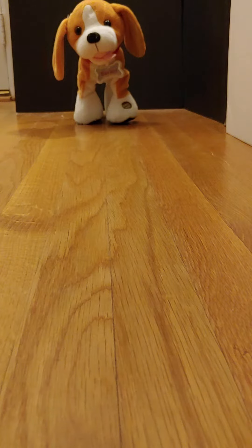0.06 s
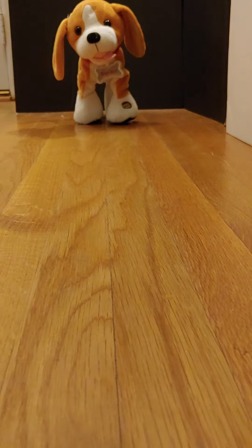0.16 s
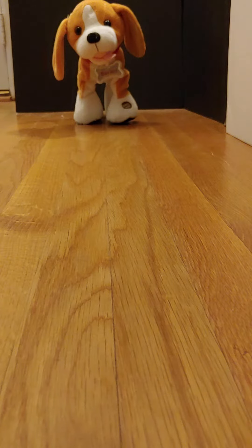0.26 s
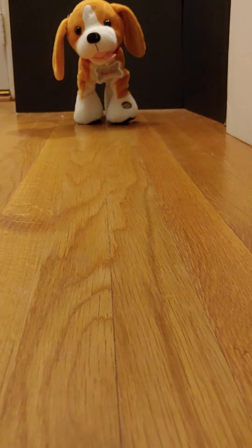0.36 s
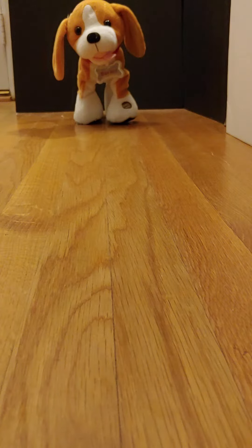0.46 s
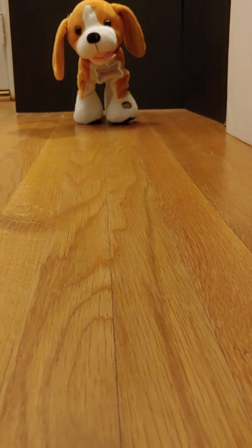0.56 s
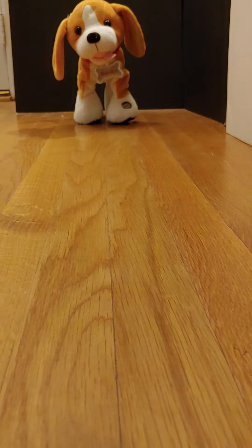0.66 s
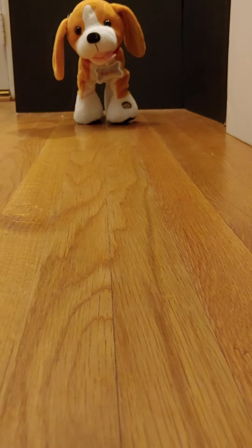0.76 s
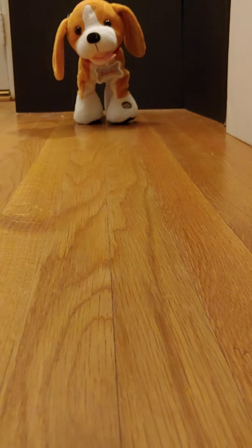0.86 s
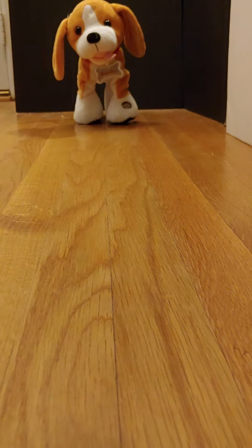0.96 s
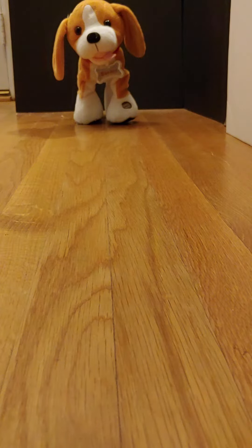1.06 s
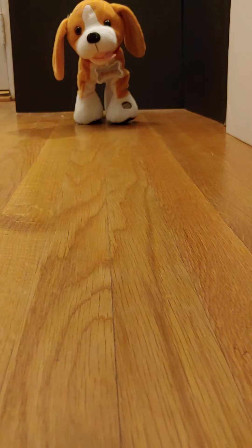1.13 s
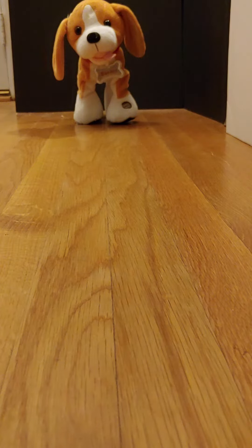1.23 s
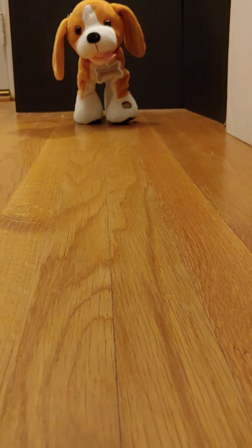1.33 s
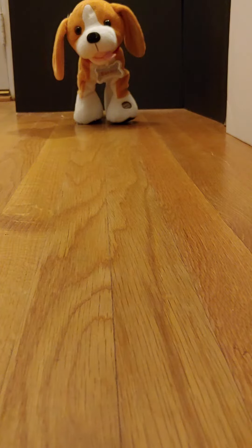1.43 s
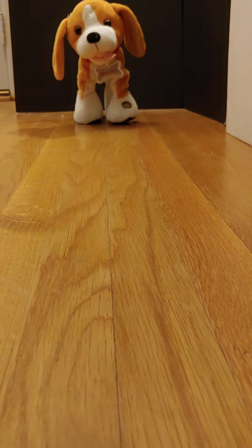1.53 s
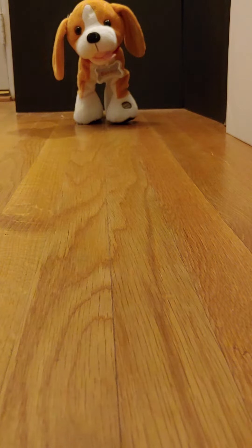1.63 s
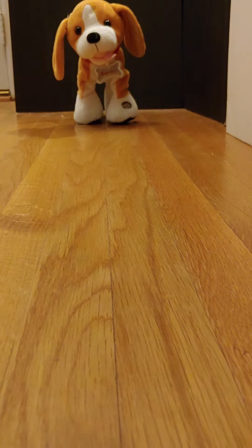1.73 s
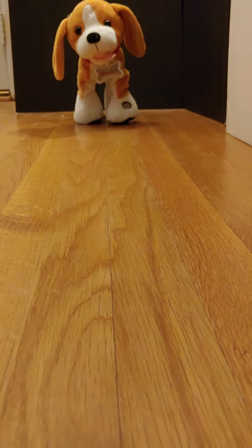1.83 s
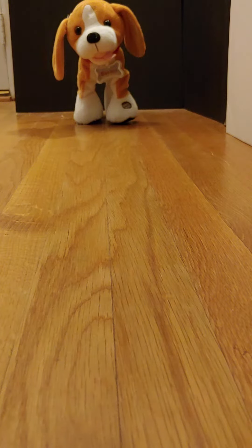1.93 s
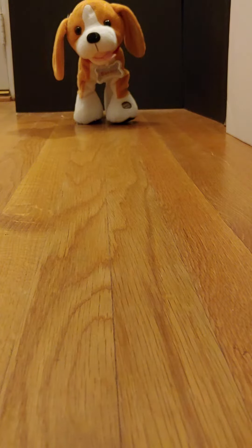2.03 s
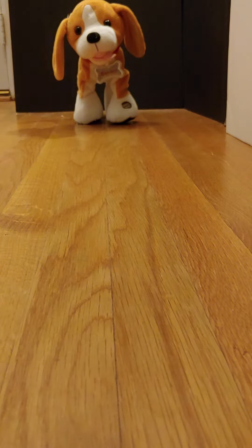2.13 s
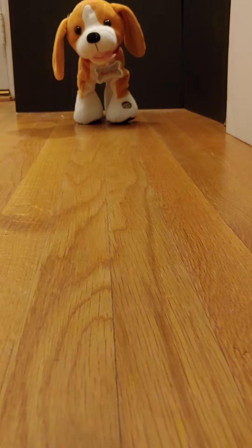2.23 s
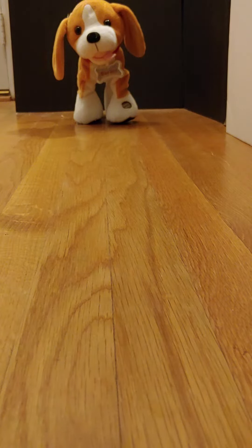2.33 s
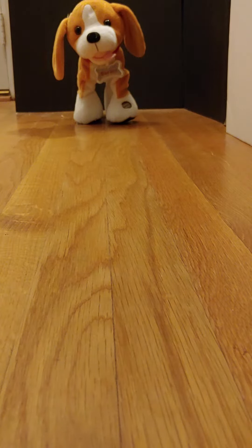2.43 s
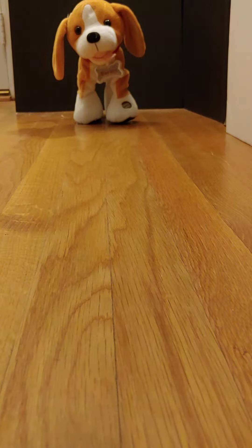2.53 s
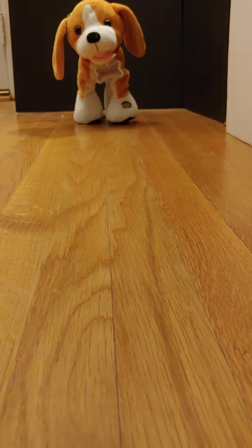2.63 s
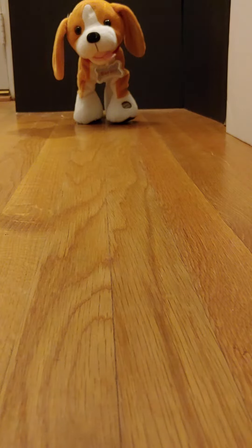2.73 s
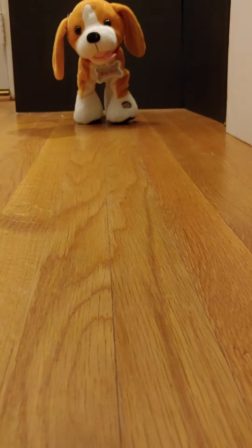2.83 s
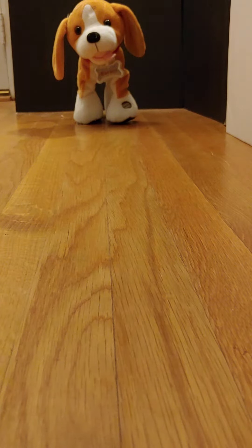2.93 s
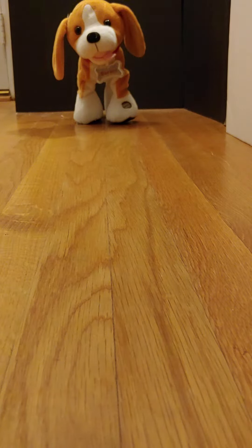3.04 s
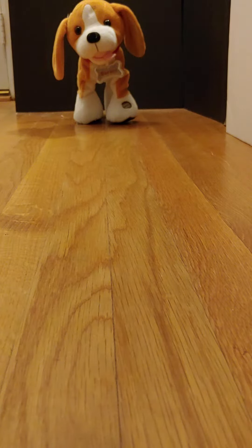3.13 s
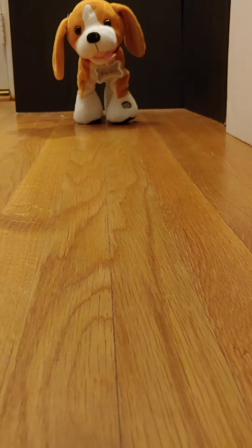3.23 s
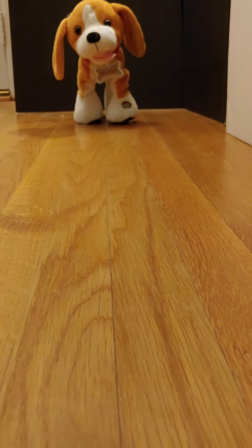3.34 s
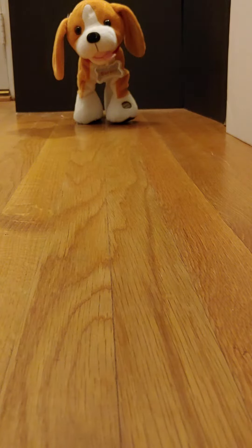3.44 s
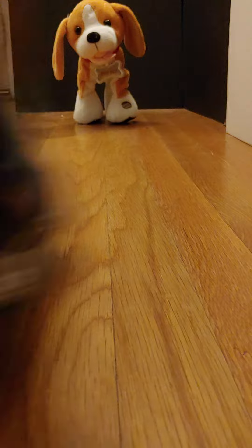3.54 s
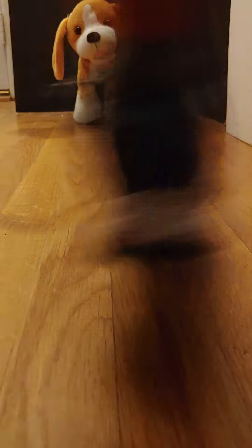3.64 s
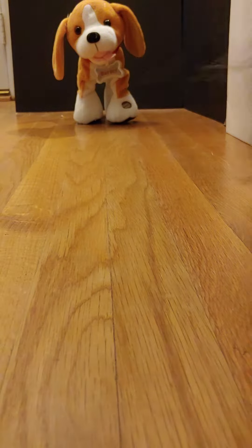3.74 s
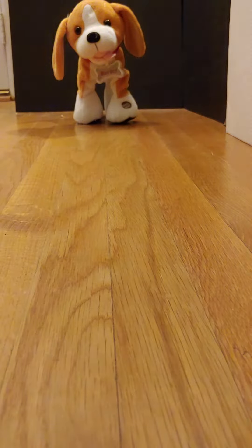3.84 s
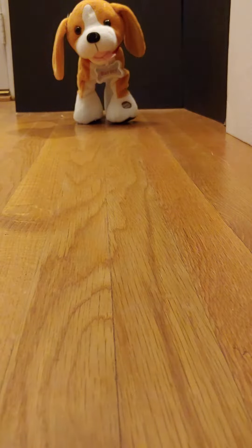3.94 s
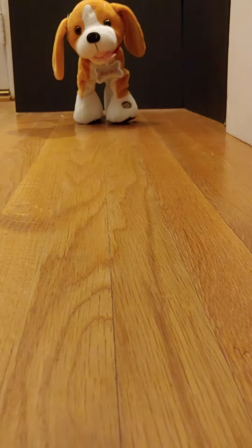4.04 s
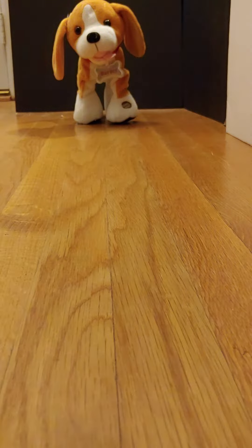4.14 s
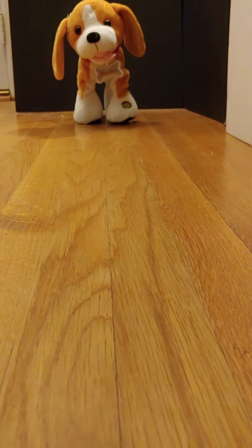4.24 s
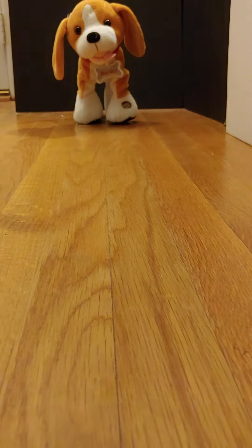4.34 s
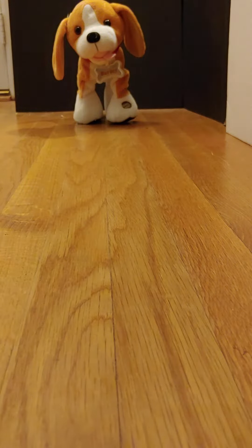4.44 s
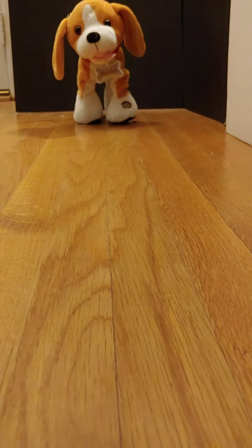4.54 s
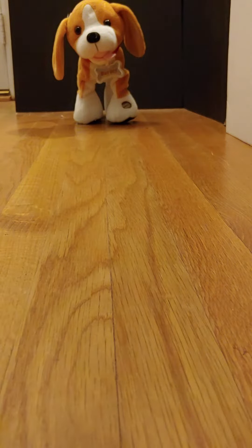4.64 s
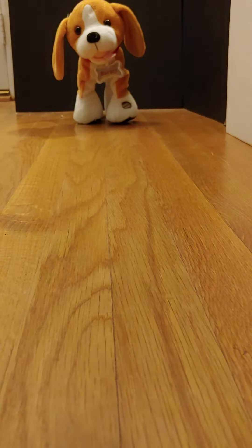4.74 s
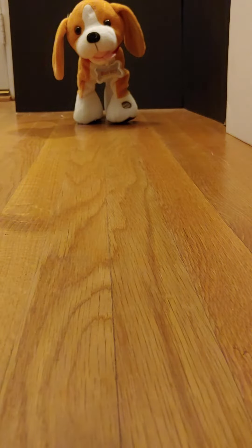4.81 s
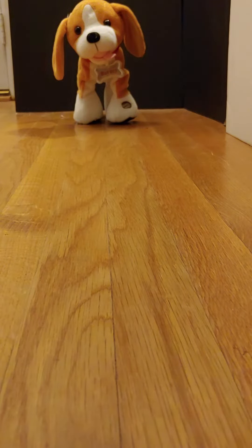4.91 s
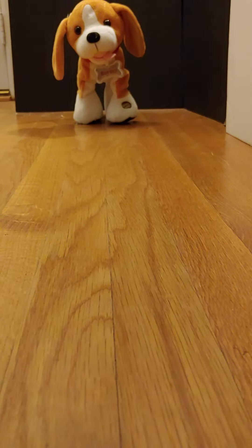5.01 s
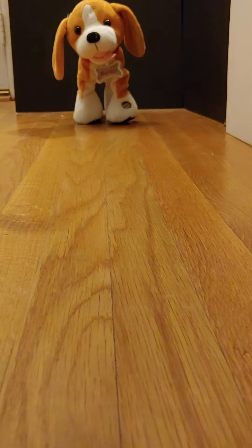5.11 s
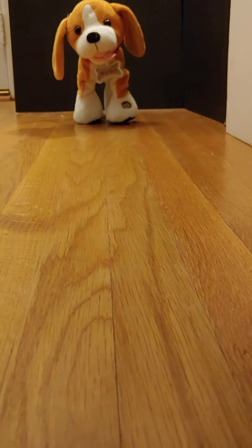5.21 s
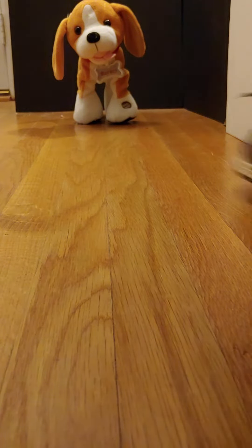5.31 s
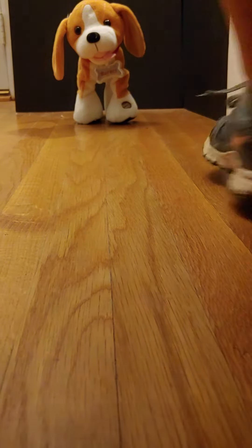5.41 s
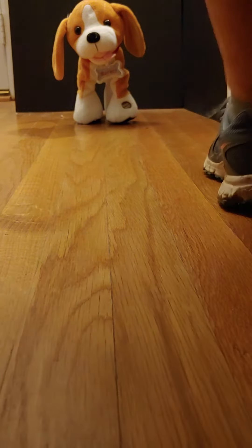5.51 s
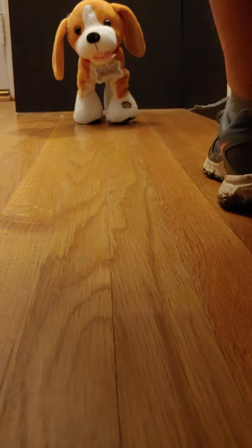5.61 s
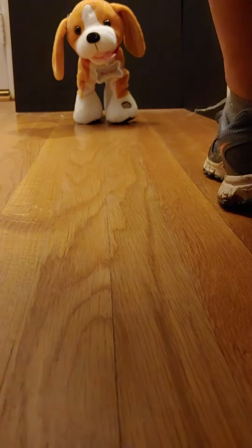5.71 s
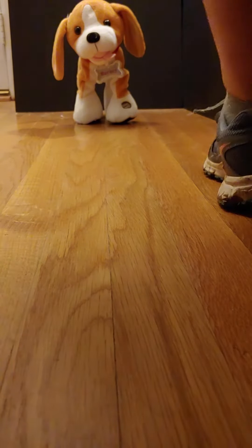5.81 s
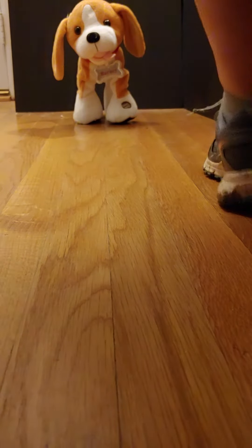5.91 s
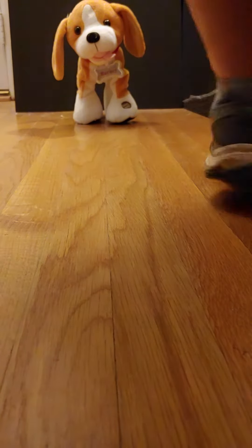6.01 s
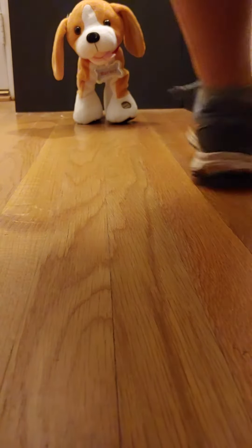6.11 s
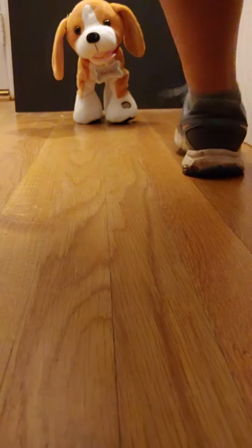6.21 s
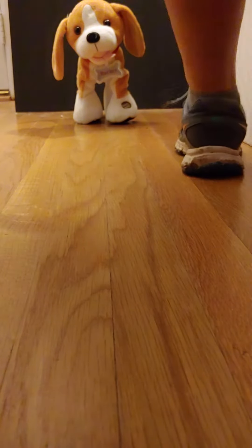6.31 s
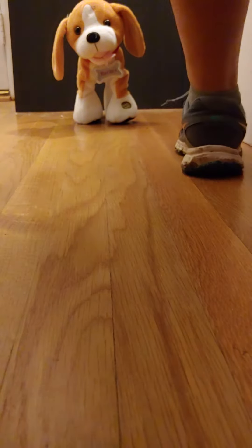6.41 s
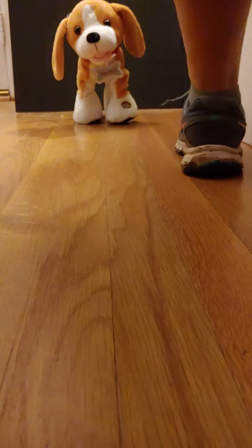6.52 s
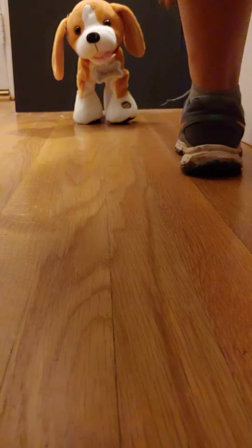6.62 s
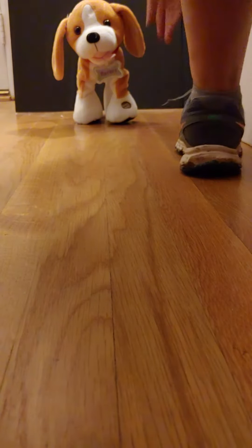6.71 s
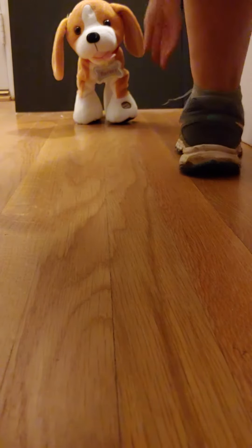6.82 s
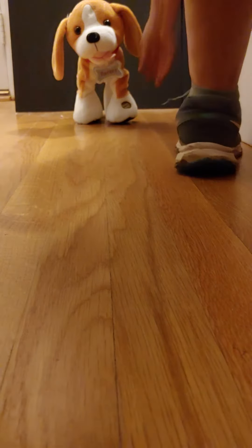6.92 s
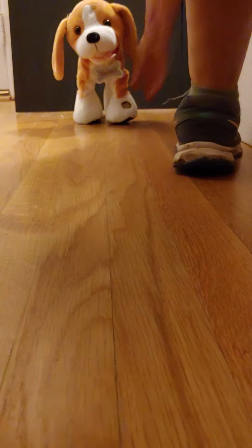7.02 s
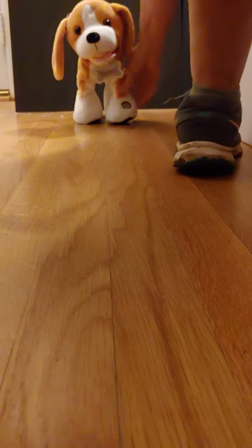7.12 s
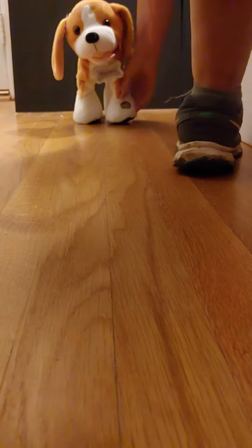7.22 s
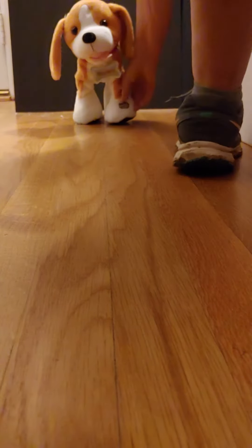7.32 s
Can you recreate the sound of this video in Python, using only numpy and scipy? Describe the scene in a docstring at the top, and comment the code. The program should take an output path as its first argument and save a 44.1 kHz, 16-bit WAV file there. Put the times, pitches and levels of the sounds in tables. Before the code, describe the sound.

Light taps and gritty sole scrapes on wooden boards in a small room, building to sharp nearby footfalls and a quiet rustling.

```python
"""A small room with a hardwood floor: soft-soled shoes step and scuff close to a phone standing on the boards.
Each footfall is a struck set of decaying board modes with a noisy first contact; near walls and a tail answer it.
Soles scrape as shaped, streaky noise with crackle, rasp and rumble; a loaded shoe wheezes through narrow bands.
A long soft rustle comes near the end, as the background of room air and a low two-tone hum grows louder.
Two microphone ports colour left and right differently."""
import sys
import numpy as np
from scipy import signal
from scipy.fft import rfft, irfft
from scipy.io import wavfile
from scipy.ndimage import uniform_filter1d

SR = 44100
rng = np.random.default_rng(int(sys.argv[2]) if len(sys.argv) > 2 else 0)


def wav_record(signal):
    """Record a signal, one row per channel, as 16-bit PCM in the file named by sys.argv[1]."""
    frames = np.transpose(np.atleast_2d(signal))
    bounded = np.clip(frames, -1, 1)
    # unit amplitude maps onto the largest positive 16-bit level
    quanta = np.round(bounded * 32767).astype(np.int16)
    wavfile.write(sys.argv[1], SR, quanta)


N = 324614

# Footfalls and taps: [t/s, tap level/dB near 1.3 kHz, then against the tap: thud/dB near 110 Hz,
# knock/dB near 350 Hz, tick/dB near 5 kHz; knock f/Hz, tap f/Hz, treble L-R/dB, ring as a factor on t60]
BLOWS = [(0.049, -36.5, -38, -44, -15.5, 280, 1590, 2, 0.75), (0.252, -77, 31.5, 8, -22, 170, 1320, 0, 2.2),
         (0.542, -41.5, -29, -24, -30, 471, 1380, -23, 0.45),
         (0.76, -40, -34, -16, -32, 538, 1380, -19, 1.8), (0.791, -25, -30, -12, -74, 430, 1243, -24, 1.56),
         (0.829, -31.5, -18, 0.5, -25, 450, 1290, -17, 1.4),
         (1.155, -37, 13.5, -22, -48, 246, 1240, -42, 0.39),
         (1.19, -40.5, 7.5, -6, -23, 226, 1200, -8, 1.3), (1.271, -52, 7, -12, -19, 234, 930, -4.5, 0.56),
         (1.673, -31, -11.5, 6.5, -19, 433, 1410, -17, 1.03),
         (1.87, -28.5, -22, -87, -25.5, 409, 1496, -28, 1),
         (1.995, -39.5, -12, -43, -38, 218, 1310, -10, 1.5), (2.259, -29, 7, -6, -39, 223, 1310, -22, 0.6),
         (2.291, -55, 8, 24, -28, 220, 1320, 6, 2), (2.322, -28.5, -2, -34, -17.5, 183, 1360, -20, 0.27),
         (2.378, -36, -29, -17, -26, 215, 1330, -20, 0.42),
         (2.428, -34, -10, -23, -15, 237, 1430, -15, 0.57),
         (2.466, -35, -12, -7.5, -24.5, 291, 1340, -10.5, 0.98),
         (2.685, -41.5, 1, -0.5, -4, 284, 1280, 6, 0.68),
         (2.785, -30.5, -1.5, -24, -16, 234, 1380, -10, 0.51),
         (3.283, -49, -13, -21, -21, 221, 1170, 14, 3.7), (3.777, -33, -25, -10.5, -20, 410, 1420, 20, 3.2),
         (4.013, -21.5, -4, 2, -18.5, 347.5, 1250, 1.5, 0.65),
         (4.219, -32.5, -14, -22, -19, 490, 1420, 3, 1.9), (4.305, -52.5, 17, -3, -14, 285, 1350, -4, 4.8),
         (4.33, -44.5, 9, -18, 1.5, 174, 1540, -3, 1.2), (4.567, -54, -24, -4, -16, 202, 1330, 9, 2.8),
         (4.836, -7.5, -19, -12, -19.5, 460, 1530, 14.5, 0.86),
         (4.862, -56, 23.5, -9, -20, 105.2, 1300, 3, 1.5), (5.508, -23.5, -3, -9.5, -47, 333, 1120, 3, 1.7),
         (5.538, -26.5, -2, 1.5, -31, 185, 960, -5, 0.34),
         (5.559, -27.5, -51, -10, -19, 211, 1340, -6, 2.3),
         (5.649, -39.5, -13, -7, 1.5, 210, 1420, 22, 0.53), (5.844, -24, -6, -7, -39, 516, 884, 6, 0.55),
         (5.892, -45, 13, 12, -20, 434, 1060, 1, 0.65), (6.019, -14, -32, -14, -14, 260, 1300, 3, 0.64),
         (6.109, 0, -37, -33, -11, 518, 1230, -6, 0.51), (6.123, -25.5, -7, -17, -44, 205, 1320, 11, 0.84),
         (6.242, -43.5, 10, -4, -16, 204, 1280, -5, 2), (6.306, -27, -10, -24.5, -53, 164, 670, -5, 1.1),
         (6.628, -32.5, -31, -26, -12.5, 620, 1410, -4, 2.3),
         (6.941, -58.5, 17.5, -7, -18, 162, 1300, -1.5, 1)]
# Where the thud, knock, tap and tick levels of a blow apply: [f/Hz]
BLOW_HZ = [110, 350, 1300, 5000]
# Pitches of the modes of boards and sole, before each blow detunes them: [f/Hz]
MODE_HZ = [60, 78, 102, 153, 221, 280, 350, 400, 540, 680, 770, 860, 1055, 1180, 1290, 1400, 1480, 1620,
           1900, 2900, 3370, 4120, 4900]
# The same modes, row for row: [relative level/dB, t60/s at ring 1]
MODES = [(-40, .2), (-38, 0.17), (1, 0.4), (2.5, 0.16), (1, 0.15), (2.5, 0.05), (0.5, 0.055), (-8.5, 0.11),
         (-3.5, 0.046), (2.5, 0.022), (1.5, 0.027), (-5.5, 0.079), (0, 0.024), (-6, 0.032), (-6.5, 0.048),
         (-10, 0.11), (-9.5, 0.022), (3, 0.0099), (-2, 0.024), (-8, 0.025), (-2, 0.03), (-4.5, 0.024),
         (1.5, .012)]

# Soles rubbing the boards, one row a scuff: [t/s at full strength, rise/s, hold/s, fall/s, scrape level/dB,
# body/dB near 1.3 kHz against the scrape, rumble level/dB, rasp f/Hz, rasp/dB against the scrape]
SCUFFS = [(0.0, 0.0088, 0.0047, 0.045, -68.5, 14.5, -65, 2120, -12),
          (0.073, 0.051, 0.035, 0.031, -66.5, 19, -73, 1970, -2),
          (0.318, 0.39, 0.027, 0.11, -73, 11, -91, 2400, -16),
          (0.534, 0.027, .003, 0.052, -68.5, 14, -82, 1940, -4),
          (0.812, 0.071, 0.027, 0.058, -63, 22.5, -59, 2130, -18),
          (1.182, 0.12, 0.19, 0.12, -72.5, 15, -69, 2580, -12),
          (1.543, 0.12, 0.018, 0.067, -49.5, 10.5, -60.5, 2720, -7),
          (1.604, 0.067, 0.031, .021, -39.5, 3, -57, 3150, -3),
          (1.637, 0.015, 0.0083, 0.036, -38.5, 4, -46.5, 1970, 4.5),
          (1.672, .012, 0.017, 0.37, -61.5, 12, -62, 2180, -8),
          (1.885, 0.026, .003, 0.11, -61.5, 4.5, -64, 1970, -14),
          (1.994, 0.21, 0.023, 0.095, -60.5, -6, -65.5, 3080, -29),
          (2.066, .05, 0.0089, 0.19, -78.5, 20, -71, 2300, -14),
          (2.261, 0.023, 0.057, 0.15, -62.5, 14, -62, 2000, -9),
          (2.382, 0.045, 0.15, 0.14, -66.5, 17, -59, 2060, -10),
          (2.534, 0.044, .003, 0.088, -54, 3.5, -57, 3450, -4.5),
          (2.61, 0.085, .15, .03, -61.5, 12, -52, 700, -1),
          (2.779, 0.017, 0.037, 0.043, -47.5, 10, -46, 2680, -9),
          (2.847, 0.029, 0.0044, 0.084, -70.5, 19.5, -56.5, 800, 0),
          (3.118, 0.21, .005, 0.083, -75, 15, -74, 900, -7.5),
          (3.417, 0.049, .003, 0.037, -59, 7.5, -69, 2320, -7),
          (3.574, 0.088, .005, 0.16, -67, 12, -67, 800, 6),
          (3.72, .03, .02, 0.067, -55, 5.5, -55, 580, 10.5),
          (3.795, 0.098, 0.018, 0.16, -49.5, 4.5, -61, 850, -1),
          (3.937, 0.035, .04, 0.14, -73, 8, -65.5, 3100, -7),
          (4.028, .011, 0.13, 0.17, -69.5, 7.5, -66, 2580, -18),
          (4.208, 0.038, 0.0039, 0.086, -64.5, 18, -53.5, 2000, -4),
          (4.328, .04, .003, 0.096, -67, 10.5, -77, 2420, -4),
          (4.504, 0.087, .003, 0.036, -59.5, 4.5, -60, 3050, -5),
          (4.564, 0.018, .03, 0.047, -64.5, 15.5, -48.5, 2260, 6.5),
          (4.61, 0.04, 0.012, 0.06, -77, 11, -51.5, 800, 18.5),
          (4.822, 0.073, .003, 0.014, -54, 1.5, -54, 3300, -20),
          (4.84, 0.0087, 0.025, 0.047, -41.5, 7.5, -48, 2530, -6),
          (4.895, .021, 0.04, 0.18, -54.5, 10.5, -48.5, 2150, -10),
          (5.089, 0.078, .003, 0.079, -53, 5, -56.5, 2090, -11),
          (5.187, 0.043, .003, 0.066, -63.5, 4, -75, 3000, -19),
          (5.516, 0.012, 0.0037, 0.045, -52.5, 15, -59, 2150, -15),
          (5.552, 0.012, .003, 0.054, -46.5, 7, -45, 2120, -15),
          (5.654, .15, .015, 0.054, -50.5, 2, -60.5, 4740, -11.5),
          (5.849, 0.023, .003, .04, -45, 6.5, -52.5, 3120, -15.5),
          (5.916, 0.047, 0.033, 0.039, -72, 8, -56.5, 2500, -10),
          (6.017, 0.024, 0.014, 0.028, -48, 8.5, -41.5, 4900, -0.5),
          (6.067, 0.11, 0.022, 0.025, -48, 2.5, -49, 2420, -20),
          (6.111, 0.017, .003, 0.095, -40.5, 12.5, -46, 3500, -15),
          (6.235, .04, 0.018, 0.088, -59, 8, -48.5, 4800, -2)]
# A long soft rustle near the end, as the background grows louder: [t/s, scrape level/dB]
RUSTLE = [(6.3, -65), (6.38, -60.5), (6.47, -59), (6.54, -54.5), (6.75, -57), (6.87, -59.5), (6.92, -52.5),
          (7.04, -59.5), (7.22, -63), (7.36, -71)]
# Faint rubbing between scuffs: [level/dB] of scrape, body, rumble and rasp
REST_DB = [-78.5, -76, -77.5, -90]
# Spectrum of the scraping: [f/Hz, relative level/dB per Hz]
SCRAPE = [(1290, -27), (2200, -6), (2570, -11), (2720, -8.5), (2980, -10.5), (3450, -6.5), (3780, -9),
          (7580, -13.5), (8370, -29.5), (9700, -25), (11700, -23), (14400, -42), (15600, -74)]
# Spectrum of the crackling body: [f/Hz, relative level/dB per Hz]
BODY = [(350, -100), (600, -15.5), (779, -14.5), (865, -8.5), (1190, -5), (1340, 5), (1510, -5.5),
        (1910, -9.5), (2400, -38.5), (3120, -32), (5280, -120)]
# Spectrum of the rumble in the boards: [f/Hz, relative level/dB per Hz]
RUMBLE = [(82, -38), (140, -3), (178, 2.5), (302, 1.5), (345, -8.5), (425, 1), (700, -8.5), (910, -69),
          (1540, -120)]

# Air squeezed out of a shoe: [start t/s, rise/s, fade/s, peak level/dB, whole pitch glide as a share]
WHEEZES = [(1.12, .12, .27, -53.5, -0.029), (1.93, 0.038, 0.14, -56, -0.025),
           (5.619, 0.027, 0.19, -55.5, 0.026), (5.88, 0.036, 0.067, -65, .03)]
# Whistling bands of each wheeze: [mid-glide f/Hz, width/Hz, relative level/dB]
VENTS = [
    [(930, 55, 5), (1360, 64, 2), (1600, 160, 3.5), (2148, 70, 5.5), (3060, 60, -8), (3270, 100, 3.5),
     (3850, 240, -4)],
    [(749, 14, 4), (1586, 85, 6), (2190, 30, 4), (3100, 150, -16), (3800, 110, -18), (4580, 100, -1),
     (5160, 46, 6)],
    [(2093, 63, 1), (3070, 140, -5), (4230, 150, -13)],
    [(2090, 68, 7), (3180, 100, -9)],
]

# Near walls: [delay t/s, level/dB]
ECHOES = [(.004, -11.5), (.0075, -10), (0.012, -15.5), (0.027, -32)]
# Decay of the room's tail: [f/Hz, t60/s]
ROOM_T60 = [(100, 0.48), (400, 0.23), (1300, 0.15), (4000, 0.16), (12000, 0.073)]
# Left-right likeness of the diffuse sound: [f/Hz, share from 0 to 1]
LIKENESS = [(60, 0.92), (180, 0.87), (550, 0.69), (1650, 0.066), (4970, -0.0), (15000, 0.0)]

# Spectrum of the room air: [f/Hz, relative level/dB per Hz]
ROOM_AIR = [(88, -30), (150, 0), (221, -19.5), (428, -10), (596, -18), (862, -10), (950, -18), (1300, -3),
            (2660, -22.5), (3300, -17.5), (3850, -33), (7450, -18.5), (8380, -35.5), (11700, -28.5),
            (15600, -36)]
# Spectrum of the air's low end: [f/Hz, relative level/dB per Hz]
LOW_AIR = [(20, -34), (35, 1.5), (60, -10.5), (80, -2.5), (100, -8), (130, -7), (170, -22)]
# Tones of the hum: [f/Hz, rms level/dB before the recorder's gain]
HUM = [(59.2, -63.5), (119.6, -69)]
# The recorder's gain on the background rises and falls: [t/s, gain/dB]
BACKGROUND_GAIN = [(0, 1), (1.5, 0), (2.3, 4.5), (3, 3), (3.62, 1.5), (3.74, 8.5), (3.86, 9), (4, -1),
                   (4.8, 6.5), (5.4, 0.5), (6, 8.5), (6.3, 15.5), (6.7, 12), (7.1, 13.5), (7.36, 8)]
# Difference between the microphone ports: [f/Hz, L-R/dB]
PORTS = [(60, 1.5), (92, -4), (140, 2.5), (210, -3.5), (330, 0), (500, -3), (770, 1), (1170, -15),
         (1790, -11.5), (2740, 2), (4190, 2.5), (6410, -3), (9810, -0.5), (15000, 3.5)]

FOCUS_DB, FOCUS_WIDTH = 11.5, 0.092  # lift of modes near a blow's own pitches; width as a share of pitch
SNAP_DB, SNAP_S = -0.5, 0.023  # extra strength while the sole damps the boards, and its decay time
CRACK_DB, CRACK_S, CRACK_HZ = -1, 0.0011, 6670  # noisy first contact: level, decay time, upper edge
EDGE_DB = 20  # a scuff's rise and fall times are counted to this far below full strength
CRACKLE_PER_S, CRACKLE_DB = 120, 2  # grains that snap under a sole: rate, lowest gain
STREAK_DB = 2.5  # depth of the short coloured streaks in a scrape
RASP_WIDTH = 810  # Hz, of the tread's own resonance
RUSTLE_BODY_DB, RUSTLE_RUMBLE_DB, RUSTLE_RASP_DB = 3.5, -4, -11  # against the rustle's scrape level
RUSTLE_RASP_HZ = 4770
WHEEZE_START_DB, WHEEZE_END_DB = -15, -14  # against the peak level
ROOM_DB = -15.5  # strength of the tail, without the near echoes
ROOM_AIR_DB, LOW_AIR_DB = -70.5, -66.5  # before the recorder's gain
EDGE_HZ = 15750  # upper band limit


def steps():
    """All footfalls, dry: each one strikes the boards at its own time."""
    out, chance = np.zeros((2, N)), rng.standard_normal((len(BLOWS), 600))
    for (s, *row), draw in zip(BLOWS, chance):
        add(out, s, blow(*row, draw))
    return out


def blow(tap_db, thud_db, knock_db, tick_db, knock_hz, tap_hz, pan_db, ring, chance):
    """One blow rings every mode of the boards; its row and chance set their strengths and detuning."""
    hz, (db, t60) = np.array(MODE_HZ)[:, None], np.transpose(MODES)[:, :, None]
    t = np.arange(SR // 2) / SR
    side = np.array([.5, -.5])[:, None, None]  # left, right

    colour = np.transpose([BLOW_HZ, tap_db + np.array([thud_db, knock_db, 0, tick_db])])
    focus_db = sum(FOCUS_DB * (np.exp(-(np.log(hz / f) / FOCUS_WIDTH) ** 2) - .5) for f in (knock_hz, tap_hz))
    hz = hz * (1 + .012 * chance[:len(hz), None])
    lean_db = side * pan_db * hz / (hz + 1500)  # mostly the treble leans towards a side

    # high modes reach each port by their own path
    path_s = side * hz / (hz + 3000) * .0005 * chance[-len(hz):, None]
    turns = hz * (t + path_s)
    # the deepest modes, the joists, ring nearly alike under every blow
    decay_db = -60 * t / (ring ** (hz / (hz + 250)) * t60)
    level_db = read(colour, hz) + db + focus_db + lean_db + decay_db
    modes = -(amp(level_db) * np.cos(2 * np.pi * turns)).sum(1)  # the boards are pushed down first
    modes *= np.sin(np.pi / 2 * np.minimum(t / .0011, 1)) ** 2  # onset of 1.1 ms
    modes *= 1 + amp(SNAP_DB) * np.exp(-t / SNAP_S)

    crack = chance[100:].reshape(2, -1) * np.exp(-t[:250] / CRACK_S)
    band = signal.butter(4, [1800, CRACK_HZ], "bandpass", fs=SR, output="sos")
    crack = signal.sosfilt(band, crack)
    modes[:, :250] += crack * amp(tap_db + tick_db + CRACK_DB + side[:, 0] * pan_db)
    return modes


def soles():
    """Friction noise: streaky scraping, a moving rasp, a crackling body and rumble; the rustle shares it."""
    scrape, body, rumble, rasp, rasp_hz = strokes()
    snaps = rng.random(N) < CRACKLE_PER_S / SR
    snaps = snaps * amp(CRACKLE_DB + np.minimum(rng.exponential(1, N), 2))
    bursts = signal.lfilter([1], [1, -.98], snaps)  # each snap is a burst of about a millisecond
    grains = grit(0.96, size=150)
    hiss = scrape * coloured(streaked(grains), SCRAPE)
    rasping = rasp * evened(resonate(streaked(grains), rasp_hz, RASP_WIDTH))
    crackling = body * coloured(grains * (1 + bursts), BODY)
    rumbling = rumble * coloured(grit(2.46, size=600), RUMBLE)
    return hiss + rasping + crackling + rumbling


def strokes():
    """Gains of scrape, body, rumble and rasp, and rasp pitch: scuffs and rustle add in power."""
    t = np.arange(0, N / SR + .01, .001)
    columns = np.transpose(SCUFFS)[:, :, None]
    s, rise, hold, fall, scrape_db, body_db, rumble_db, rasp_hz, rasp_db = columns
    before = np.maximum(s - t, 0) / abs(rise)
    after = np.maximum(t - s - abs(hold), 0) / abs(fall)
    shape_db = -EDGE_DB * (before + after)
    full_db = np.array([scrape_db, scrape_db + body_db, rumble_db, scrape_db + rasp_db])
    scuffs = amp(full_db + shape_db) ** 2

    rustle_db = np.interp(t, *np.transpose(RUSTLE), left=-np.inf)
    parts_db = np.array([[0], [RUSTLE_BODY_DB], [RUSTLE_RUMBLE_DB], [RUSTLE_RASP_DB]])
    steady = amp(rustle_db + parts_db) ** 2 + amp(REST_DB)[:, None] ** 2
    power = scuffs.sum(1) + steady
    # the loudest rasp leads the pitch
    pitch_hz = ((scuffs[-1] * rasp_hz).sum(0) + steady[-1] * RUSTLE_RASP_HZ) / power[-1]
    return [np.interp(np.arange(N) / SR, t, row) for row in (*np.sqrt(power), pitch_hz)]


def shoe_air():
    """Noise that whistles in a few narrow, slowly gliding vents while a shoe takes the weight."""
    out = np.zeros((2, N))
    for (s, rise, fade, top_db, glide), vents in zip(WHEEZES, VENTS):
        t = np.arange(0, rise + fade, 1 / SR)
        level_db = top_db + np.interp(t, [0, rise, rise + fade], [WHEEZE_START_DB, 0, WHEEZE_END_DB])
        pitch = 1 + glide * np.linspace(-.5, .5, len(t))
        noise = rng.standard_normal((2, SR))[:, :len(t)]
        air = sum(amp(db) * evened(resonate(noise, hz * pitch, width)) for hz, width, db in vents)
        add(out, s, evened(air) * amp(level_db) * signal.windows.tukey(len(t), .2))
    return out


def room(x):
    """A few near echoes, then sparse taps of random sign whose decay time depends on pitch."""
    taps, cells = np.zeros((2, SR // 2)), np.arange(500, SR // 2 - 20, 20)
    at = cells + rng.integers(0, 20, (2, len(cells)))  # one tap in every 20 samples
    np.put_along_axis(taps, at, rng.choice([-1., 1.], at.shape), 1)
    hz, t, z = signal.stft(taps, SR, nperseg=256)
    same = np.clip(read(LIKENESS, hz), -1, 1)[:, None]
    z[1] = same * z[0] + np.sqrt(1 - same ** 2) * z[1]
    decay = amp(-60 * t / read(ROOM_T60, hz)[:, None])
    tail = signal.istft(z * decay, SR, nperseg=256)[1]
    tail *= amp(ROOM_DB) / np.linalg.norm(tail[0])
    for s, db in ECHOES:
        tail[:, round(s * SR)] += amp(db)
    thin = signal.butter(1, 300, "highpass", fs=SR, output="sos")  # light walls return little bass
    return x + signal.fftconvolve(signal.sosfilt(thin, x), tail, axes=1)[:, :N]


def background():
    """Room air and a two-tone hum of fixed pitch, raised and lowered together by the recorder's gain."""
    t, gain_db = np.arange(N) / SR, follow(BACKGROUND_GAIN)
    air = amp(ROOM_AIR_DB + 1.04 * gain_db) * coloured(grit(0.63, size=2000), ROOM_AIR)
    low = amp(LOW_AIR_DB) * coloured(rng.standard_normal((2, N)), LOW_AIR)
    hum = sum(np.sqrt(2) * amp(db) * np.sin(2 * np.pi * (hz * t + rng.random())) for hz, db in HUM)
    return air + amp(gain_db) * (low + hum)


def grit(spread_db, size):
    """Noise whose level jumps up and down now and then, as grains catch under a sole."""
    jumps = np.clip(evened(uniform_filter1d(rng.standard_normal(N), size)), -2, 2)
    return rng.standard_normal((2, N)) * amp(spread_db * jumps * abs(jumps))


def streaked(x):
    """Lifts and lowers random patches, narrow in pitch and some 60 ms long."""
    z = signal.stft(x, nperseg=512, noverlap=384)[2]
    patches = rng.standard_normal(z.shape[1:])
    patches = uniform_filter1d(patches, size=3, axis=0)  # across pitch
    patches = evened(uniform_filter1d(patches, size=20, axis=1))  # across time
    return signal.istft(z * amp(STREAK_DB * patches), nperseg=512, noverlap=384)[1][:, :N]


def resonate(x, hz, width):
    """A moving narrow band: shifts the curve hz down to zero, smooths twice and shifts back."""
    turn, r = np.exp(2j * np.pi * np.cumsum(hz) / SR), np.exp(-np.pi * width / SR)
    smooth = signal.lfilter([(1 - r) ** 2], np.convolve([1, -r], [1, -r]), x / turn)
    return 2 * (turn * smooth).real


def coloured(pair, points):
    """Gives a pair of noises a spectrum at rms 1 and makes them alike in the bass."""
    hz, (a, b) = np.fft.rfftfreq(N, 1 / SR), rfft(pair)
    same = np.clip(read(LIKENESS, hz), -1, 1)
    inside = (hz >= points[0][0]) & (hz <= points[-1][0])
    spectra = np.array([a, same * a + np.sqrt(1 - same ** 2) * b])
    return evened(irfft(spectra * amp(read(points, hz)) * inside, N))


def amp(db):
    """Decibels to gain."""
    return 10 ** (np.asarray(db) / 20)


def evened(x):
    """Scales to rms 1."""
    return x / np.sqrt(np.mean(x ** 2) + 1e-20)


def read(points, hz):
    """Reads a spectrum on a log-frequency axis."""
    f, value = np.transpose(points)
    return np.interp(np.log(hz + 1), np.log(f + 1), value)


def follow(rows):
    """A curve of (t/s, value) rows, one value a sample."""
    return np.interp(np.arange(N) / SR, *np.transpose(rows))


def add(mix, s, sound):
    """Mixes a stereo sound in at time s."""
    part = mix[:, round(s * SR):][:, :sound.shape[1]]
    part += sound[:, :part.shape[1]]


def scene():
    """Steps with the room's answer, then rubbing and rustle, wheezes and background."""
    return room(steps()) + soles() + shoe_air() + background()


def record(dry):
    """The right port is far stronger near 1.3 kHz; deepest bass is lost, peaks saturate, the band ends."""
    lean = amp(read(PORTS, np.fft.rfftfreq(N, 1 / SR)))
    ports = np.sqrt(2 / (1 + lean ** 2)) * np.array([lean, np.ones_like(lean)])  # total power is kept
    heard = irfft(rfft(dry) * ports, N)
    heard = signal.sosfilt(signal.butter(2, 35, "highpass", fs=SR, output="sos"), heard)
    heard = heard / (1 + (heard / .95) ** 4) ** .25  # the loudest crack saturates softly
    limit = signal.firwin(511, EDGE_HZ, window=("kaiser", 9), fs=SR)
    return signal.oaconvolve(heard, limit[None], "same")


dry = scene()
out = record(dry)
wav_record(out)
```